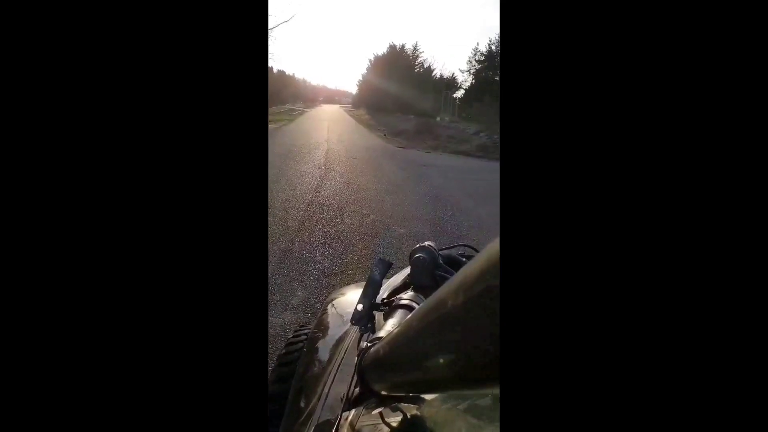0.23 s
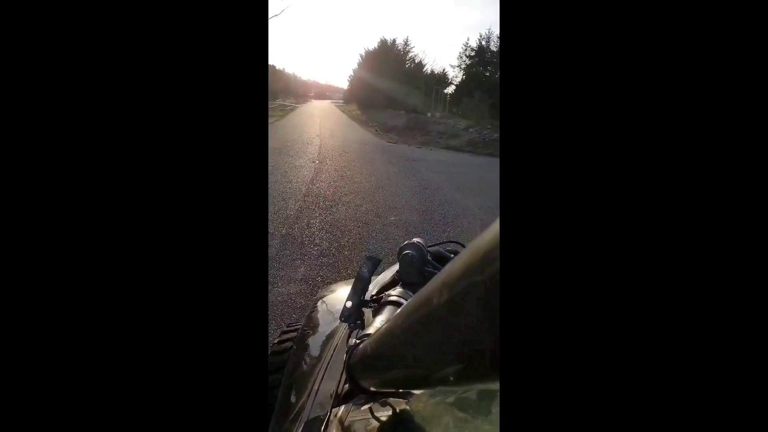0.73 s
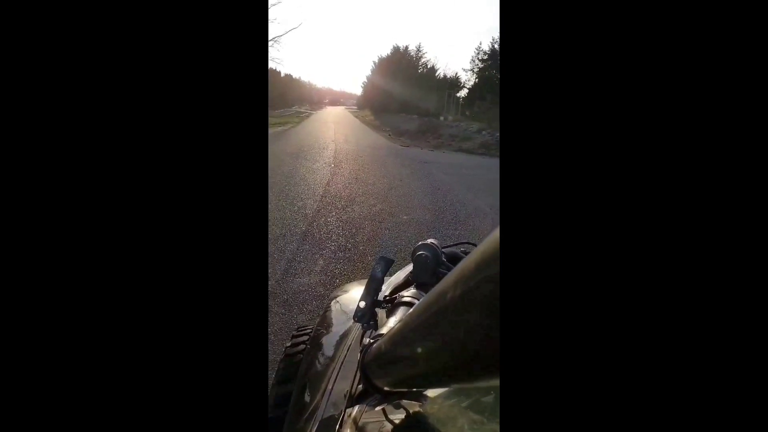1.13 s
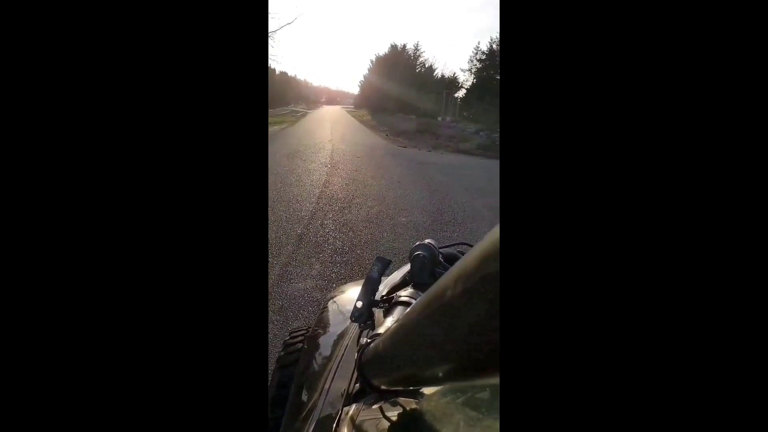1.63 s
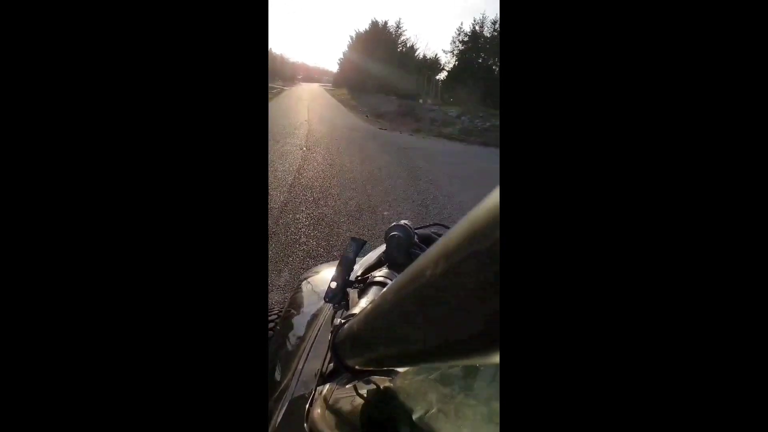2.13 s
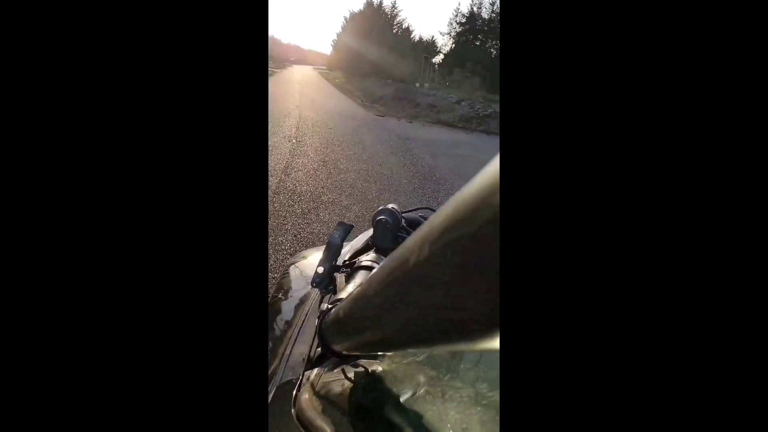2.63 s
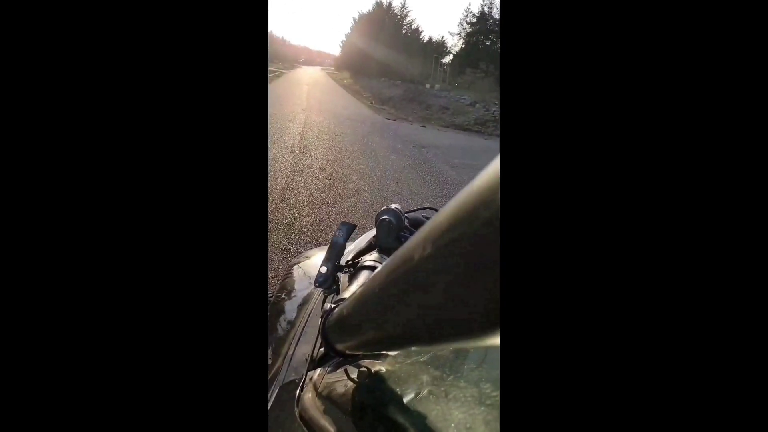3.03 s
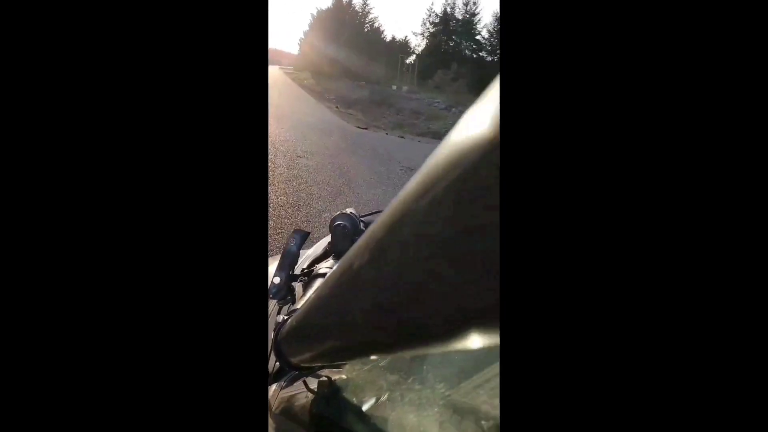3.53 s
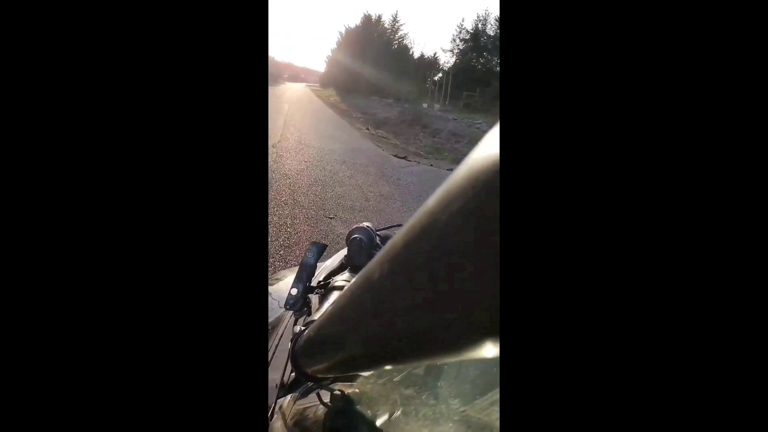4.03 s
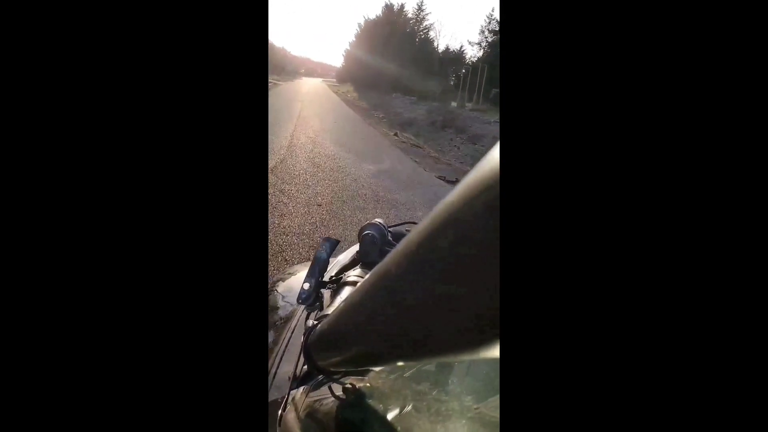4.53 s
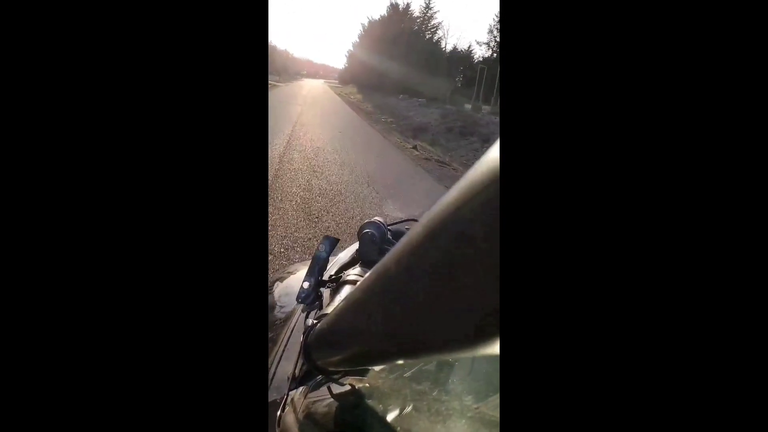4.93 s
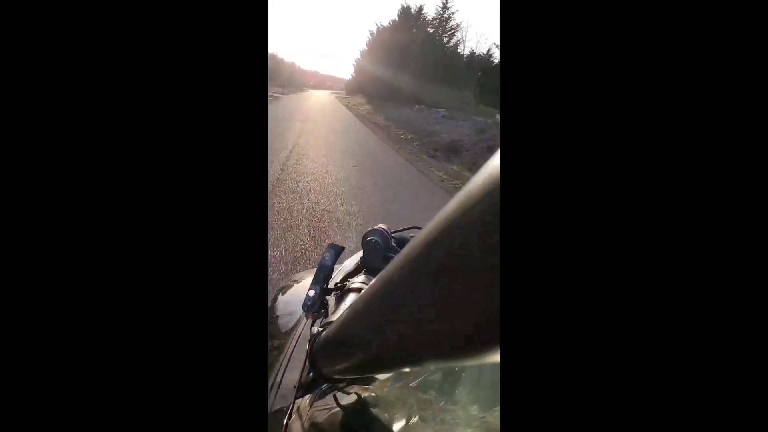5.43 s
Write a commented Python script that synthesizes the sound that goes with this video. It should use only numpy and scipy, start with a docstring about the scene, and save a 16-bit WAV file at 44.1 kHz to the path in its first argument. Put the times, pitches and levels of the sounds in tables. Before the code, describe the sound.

A turbocharged single-cylinder quad bike is heard close up from the rider's seat on a road. For the first second it burbles on a light throttle, with low exhaust beats and a metallic valve clatter. At about 1.1 seconds the throttle is blipped: the revs jump, the air box booms and the drive line gives a quick double clack. The revs fall back by 1.9 seconds, then rise again and waver at a moderate level, with a pulsing, rasping intake hiss. From about 2 seconds a fluttering turbo whistle climbs steadily and wind starts to build on the microphone. Near 3.9 seconds a second stab brings another short boom, and the engine revs up into a harder bark. It keeps climbing until the end at about 5.7 seconds, with the whistle at its highest and the wind buffeting strongest.

```python
"""On a road, from the rider's seat of a turbocharged single-cylinder quad bike pulling away.
It burbles on a light throttle, is blipped, then revs up. Every cycle gives an exhaust beat, a clatter
of valve gear and a gulp of hissing intake air. The air box booms on two stabs of the throttle and the
drive line clacks as it takes up its slack. The turbo whistles ever higher and wind builds with speed."""
import sys
import numpy as np
from scipy import signal
from scipy.fft import rfft, irfft, next_fast_len
from scipy.io import wavfile
from scipy.ndimage import uniform_filter1d, map_coordinates

SR = 44100
rng = np.random.default_rng(int(sys.argv[2]) if len(sys.argv) > 2 else 0)


def transcribe(signal):
    """Save signal, clipped to [-1, 1], as a 16-bit WAV file at the path in sys.argv[1]."""
    frames = np.atleast_2d(signal).T
    limited = np.clip(frames, -1, 1)
    pcm = np.round(limited * 32767).astype(np.int16)
    wavfile.write(sys.argv[1], SR, pcm)


N = 251370
OPEN_DB = -28  # the throttle curve's value when open

# silencer resonances: (frequency [Hz], width [Hz], relative level [dB])
SILENCER = [(226.4, 31, 2.5), (337, 34, 10), (374.3, 49.3, 9.5), (506.5, 40, -4)]
# bright colour of the inlet rush and the clacks: (frequency [Hz], relative level [dB])
AIR = [(880, -13), (1500, 8), (1740, -6.5), (2090, -7), (2440, 2.5), (3550, -1.5), (4230, -4.5), (5290, 0),
       (8050, -10), (9230, -0.5), (10400, -11.5), (11600, -1), (12500, -5.5), (14450, -13), (14900, -35)]


def amp(db):
    """Decibels to gain."""
    return 10 ** (np.asarray(db) / 20)


def unit(x):
    """Scale to rms 1."""
    return x / np.sqrt(np.mean(x ** 2) + 1e-20)


def along(points, hz):
    """Read (frequency, value) points at hz, on a log axis."""
    f, v = np.transpose(points)
    return np.interp(np.log(hz + 1), np.log(f + 1), v)


def curve(points):
    """Join (time, value) points into one value per sample."""
    return np.interp(np.arange(N) / SR, *np.transpose(points))


def wobble(rate):
    """A smooth random curve, rate knots a second."""
    return map_coordinates(rng.standard_normal(N), [np.arange(N) * rate / SR], mode="wrap")


def bump(hz, centre, width):
    """A bell curve of height 1 around centre."""
    return np.exp(-((hz - centre) / width) ** 2)


def filtered(x, response):
    """Pass x through a complex frequency response."""
    size = next_fast_len(N + SR // 2)
    return irfft(rfft(x, size) * response(np.fft.rfftfreq(size, 1 / SR)), size)[..., :N]


def noise(spectrum, gate=1):
    """Noise, gated, coloured and scaled to rms 1."""
    return unit(filtered(gate * rng.standard_normal(N), lambda hz: amp(along(spectrum, hz))))


def ticks(turns, scatter_db):
    """One impulse of random size each time turns passes a whole number."""
    crossings = np.diff(np.floor(turns), prepend=np.floor(turns[0]))
    return crossings * amp(scatter_db * rng.standard_normal(N))


def beat(turns, revs, throttle_db):
    """Pressure waves of intake and exhaust, drawn out by the silencer; under load they lope."""
    # what the pipe passes of each engine order: (frequency [Hz], low-rev level [dB], high-rev level [dB])
    pipe = np.array([(37, -24, -25), (58.7, -16.5, -17), (76, -17, -15), (99, -13.5, -15.5),
                     (120, -16, -16), (155, -17.5, -13.5), (201, -14.5, -13), (239.5, -17, -18.5),
                     (260, -24, -13.5), (304, -21, -16), (331, -20, -19.5), (381, -26.5, -16.5),
                     (421, -39, -15.5), (472, -30, -22), (514, -37, -35), (560, -56, -50), (800, -62, -40)])
    # where the exhaust opens into a bark: (start [cycles/s], full [cycles/s])
    bark_revs = [56.3, 61]
    bark = np.interp(revs, bark_revs, [0, 1])
    angle = 2 * np.pi * (turns - .17 + .003 * wobble(70))

    def order(k):
        hz = k * revs
        pipe_db = (1 - bark) * along(pipe[:, [0, 1]], hz) + bark * along(pipe[:, [0, 2]], hz)
        # each resonance holds back the orders near it, so one beat rings into the next
        lag = 1.248 * sum(np.arctan2(hz * width, centre ** 2 - hz ** 2) for centre, width, _ in SILENCER)
        return amp(pipe_db + air_box_boom_db(hz)) * np.sin(k * angle - lag)

    load_db = throttle_db - OPEN_DB
    lope = amp(load_db - 21) * sum(order(k + .5) for k in range(1, 6))  # alternate cycles differ
    wave = sum(order(k) for k in range(1, 15)) + lope
    return wave * amp(.14 * load_db + 1.36 * wobble(110))


def burble(turns, revs):
    """Strong and weak firings alternate, a little at random; their excess rings the silencer."""
    # uneven firing smooths out at high revs: (revs [cycles/s], level [dB])
    burble_by_revs = [(38, -14), (44, -22.5), (52, -20), (66, -22), (100, -39)]
    firing = turns + .25
    looseness = np.interp(revs, [40, 52], [.25, .45])
    sizes = ticks(firing, scatter_db=1.3)
    excess = sizes * ((-1) ** np.floor(firing) + looseness * rng.standard_normal(N))

    def muffled_ring(hz):
        ring = sum((-1) ** k * amp(db) * 1j * hz * width / (centre ** 2 - hz ** 2 + 1j * hz * width)
                   for k, (centre, width, db) in enumerate(SILENCER))
        return ring / (1 + (hz / 515) ** 24)

    return amp(along(burble_by_revs, revs)) * unit(filtered(excess, muffled_ring))


def clatter(turns, revs, throttle_db, ring_s=.033, cruise_revs=50):
    """Valves and piston tap the casing several times a cycle, harder on an open throttle."""
    # metallic colour of the casing: (frequency [Hz], relative level [dB])
    casing = [(350, -45), (600, -47), (638, 2.5), (715, -5.5), (834, 3), (1230, 3), (1510, -3.5),
              (1840, -5.5), (2080, -8), (2380, -9.5), (2830, -24), (4550, -17.5), (7000, -30), (9100, -77),
              (15400, -120)]
    t = np.arange(SR // 50) / SR
    load = np.interp(throttle_db, [-45, -30], [.6, 1.8])
    taps = load * ticks(turns + .12, scatter_db=2.5) + .7 * ticks(4 * turns + .3, scatter_db=2)
    gate = signal.fftconvolve(taps, amp(-60 * t / ring_s))[:N] + .25
    running_rms = np.sqrt(uniform_filter1d(gate ** 2, size=SR // 5))
    level_db = -28 + .9 * np.log2(revs / cruise_revs) + wobble(14)
    return amp(level_db) * noise(casing, gate / running_rms)


def intake(turns, throttle_db):
    """Air is sucked past the throttle once a cycle: a sharp hiss over a rasp in the inlet pipe."""
    # airflow through one gulp: (offset from peak suction [cycles], relative level [dB])
    stroke = [(-.5, -47), (-.27, -57), (-.15, -16.5), (-.08, -13), (-.01, -9), (.07, -13), (.16, -14.5),
              (.3, -22.5), (.5, -34)]
    # colours of the hiss and the rasp: (frequency [Hz], relative level [dB])
    hiss_colour = [(1500, -20.5), (2600, -3), (2850, -4.5), (3120, -15), (3520, -1.5), (4050, -14.5),
                   (4620, -1.5), (5000, -7.5), (5450, -1), (5900, -10), (7500, -8), (8200, -13.5),
                   (9450, -1.5), (10450, -15.5), (11250, 2), (11800, 6), (12250, -1), (13200, 0.5),
                   (14550, -5), (14900, -24)]
    rasp_colour = [(500, -61), (850, -22.5), (1300, 8), (1600, 2.5), (1780, -16), (2000, 10), (2350, -7),
                   (2750, -3), (3200, -11), (4500, -24.5)]
    cycle, phase = np.divmod(turns + .5, 1)
    stroke_db = np.interp(phase - .5, *np.transpose(stroke))
    size_db = 1.8 * rng.standard_normal(N)[cycle.astype(int)] + wobble(11)
    flutter_db = 2.3 * wobble(450)
    gulp = amp(stroke_db + size_db + flutter_db)
    hiss = amp(throttle_db + 2) * noise(hiss_colour, gulp)
    rasp = amp(.81 * throttle_db - 6) * noise(rasp_colour, gulp ** .48)
    return hiss + rasp


def turbo(turns, throttle_db, turbulence=.6):
    """The compressor's whistle, shaken by each beat, smeared by turbulence and coloured by the inlet."""
    # the turbo spools up: (time [s], pitch [Hz])
    spool = [(0, 1065), (1.8, 1185), (2.04, 1331), (2.3, 1599), (2.7, 1902), (2.96, 2025), (3.5, 2495),
             (3.85, 2680), (4.5, 3060), (4.9, 3430), (5.38, 4420), (5.5, 4780), (5.7, 5300)]
    # the inlet lifts or swallows the whistle: (frequency [Hz], width [Hz], gain [dB])
    inlet = [(1335, 49, 10.5), (1600, 67, 7), (1790, 55, -1), (1955, 70, 6.5), (2104, 175, 9),
             (3200, 243, -0.5), (4290, 230, -35), (4600, 95, 17), (5170, 430, 11.5)]
    # where the whistle's octave rings: (frequency [Hz])
    octave_peaks = [2740, 5670]
    pitch = curve(spool)
    waver = np.interp(pitch, [1300, 2500], [.012, .022]) * wobble(380)  # rougher as it climbs
    spin = np.exp(2j * np.pi * np.cumsum(pitch * (1 + waver + .00235 * wobble(50))) / SR)
    swirl = (wobble(300) + 1j * wobble(300)) / np.sqrt(2)
    shake_db = 5.65 * np.cos(2 * np.pi * turns)
    level_db = -31.5 + .99 * (throttle_db - OPEN_DB) + shake_db
    tone = amp(level_db) * (np.sqrt(1 - turbulence) + np.sqrt(turbulence) * swirl) * spin
    inlet_gain = lambda hz: amp(sum(db * bump(hz, centre, width) for centre, width, db in inlet))
    octave_gain = lambda hz: sum(1 / (1 + ((hz - centre) / 220) ** 2) for centre in octave_peaks)
    return filtered(tone.real, inlet_gain) + amp(-4.5) * filtered((tone * spin).real, octave_gain)


def inlet_rush(revs):
    """Air keeps rushing through the inlet between gulps, fluttering with its eddies."""
    # strength of the rush: (revs [cycles/s], level [dB])
    flow_by_revs = [(38, -41.5), (48, -59.5), (60, -45.5), (74, -34), (100, -29.5)]
    return amp(along(flow_by_revs, revs) + 2 * wobble(60)) * noise(AIR)


def wind(build_from_s=1.7, db_per_s=4.4):
    """Lumpy wind buffets the microphone, building as the bike gathers speed."""
    # colour of the buffeting: (frequency [Hz], relative level [dB])
    rumble = [(15, -30), (30, -19), (48, -12), (80, -12.5), (160, -17), (400, -22), (500, -15.5),
              (600, -28.5), (1200, -38.5), (3000, -112)]
    building_s = np.maximum(np.arange(N) / SR - build_from_s, 0)
    level_db = np.minimum(-33 + db_per_s * building_s, -15.5)
    return amp(level_db + 2 * wobble(22)) * noise(rumble)


def air_box_boom_db(hz, width_hz=26.6, attack_s=.16, release_s=.14):
    """The air box lifts engine orders near its pitch: it swells, holds and fades with each stab."""
    # booms on stabs of the throttle: (start of hold [s], hold [s], pitch [Hz], gain [dB])
    booms = [(1.086, 0.56, 179, 6), (3.915, 0.29, 250, 9)]
    swell = lambda s, hold: curve([(s - attack_s, 0), (s, 1), (s + hold, 1), (s + hold + release_s, 0)])
    return sum(db * swell(s, hold) * bump(hz, pitch, width_hz) for s, hold, pitch, db in booms)


def drive_clacks(ring_s=.18):
    """Short metallic knocks as the drive line takes up its slack."""
    # the knocks: (time [s], relative level [dB])
    knocks = [(1.1766, -5.5), (1.211, -13)]
    envelope, t = np.zeros(N), np.arange(SR // 10) / SR
    for start, db in knocks:
        envelope[round(start * SR):][:len(t)] += amp(db - 21 - 60 * t / ring_s)
    return envelope * noise(AIR)


def scene():
    """One shaft and one throttle drive the engine, with wind and clacks on top; both channels alike."""
    # engine speed: (time [s], revs [cycles/s])
    rev_points = [(0.0, 40.52), (0.86, 36.93), (1.029, 39.26), (1.254, 56.01), (1.45, 56.32),
                  (1.872, 39.89), (2.326, 53.7), (2.68, 48.1), (2.964, 48.15), (3.282, 51.73),
                  (3.731, 45.94), (3.939, 57.51), (4.106, 57.18), (4.347, 65.9), (4.502, 67.45),
                  (4.694, 74.34), (4.906, 77.47), (5.025, 84.24), (5.287, 88.92), (5.7, 103.08)]
    # the throttle, nearly shut, blipped, eased, then held open: (time [s], intake drive level [dB])
    throttle_points = [(0, -48.5), (1.06, -45), (1.19, -27), (1.3, -31.5), (1.72, -36), (2.06, -26),
                       (2.4, -28.5), (3.0, -26), (3.65, -28.5), (4.4, -28.5), (4.9, -28), (5.7, -33)]
    revs, throttle_db = curve(rev_points), curve(throttle_points)
    turns = np.cumsum(revs) / SR - .363  # running count of engine cycles
    exhaust = beat(turns, revs, throttle_db) + burble(turns, revs)
    valves = clatter(turns, revs, throttle_db)
    breath = intake(turns, throttle_db) + turbo(turns, throttle_db) + inlet_rush(revs)
    return np.tile(exhaust + valves + breath + wind() + drive_clacks(), (2, 1))


def record(dry, ceiling=.94, top_hz=15000):
    """Round off the highest peaks, then cut the very top of the treble."""
    rounded = dry / (1 + np.abs(dry / ceiling) ** 8) ** (1 / 8)
    return filtered(rounded, lambda hz: hz < top_hz)


dry = scene()
out = record(dry)
transcribe(out)
```